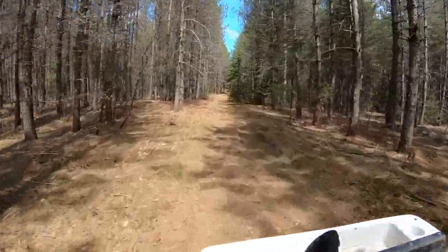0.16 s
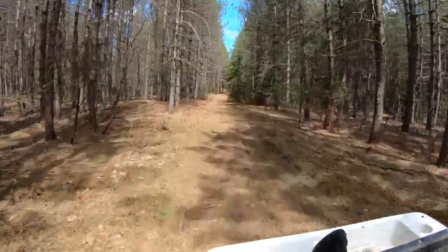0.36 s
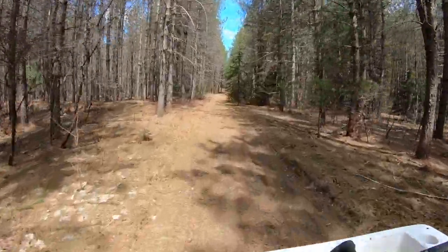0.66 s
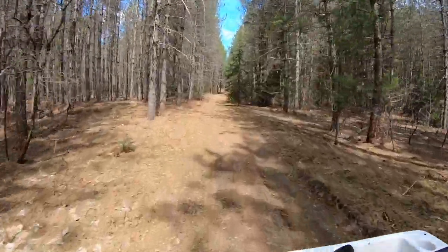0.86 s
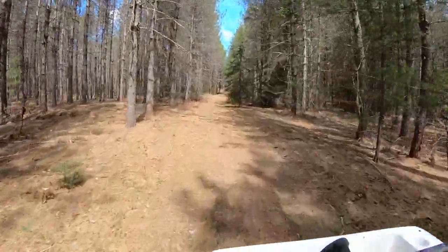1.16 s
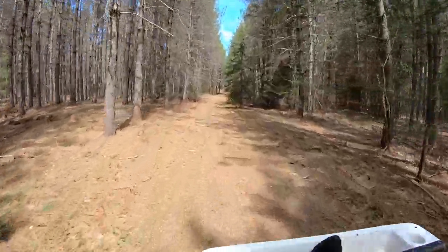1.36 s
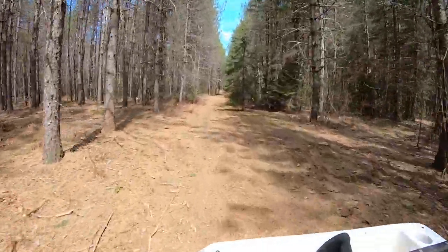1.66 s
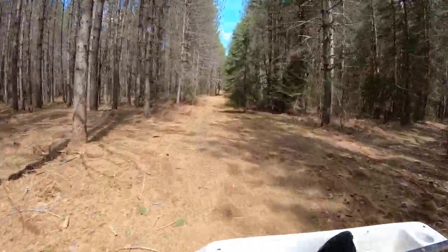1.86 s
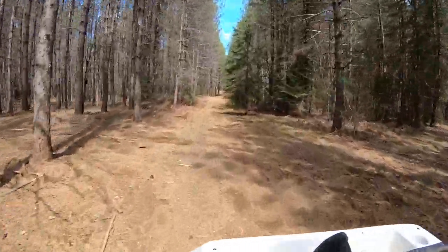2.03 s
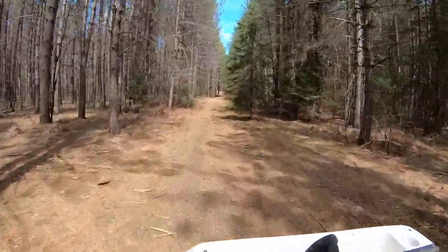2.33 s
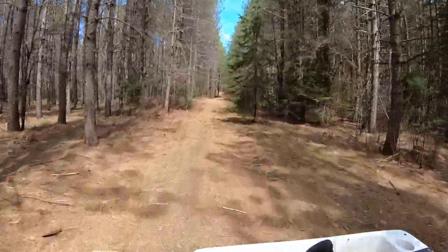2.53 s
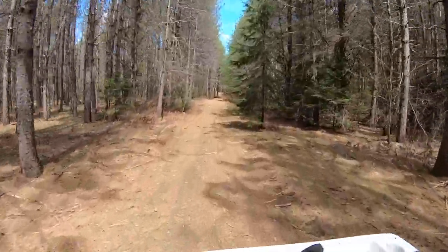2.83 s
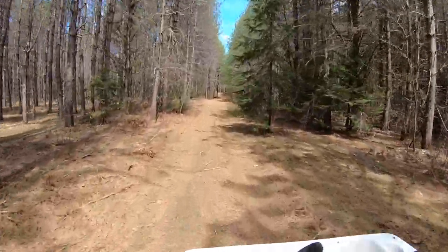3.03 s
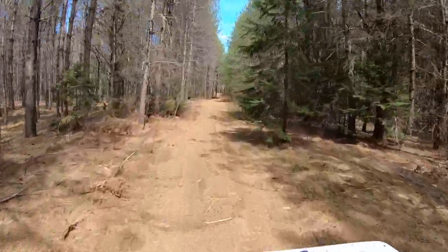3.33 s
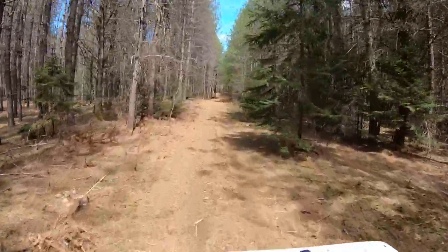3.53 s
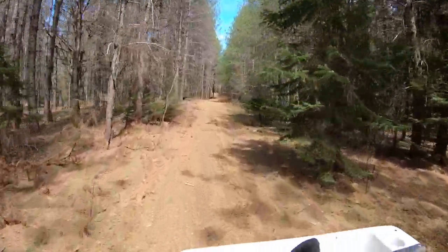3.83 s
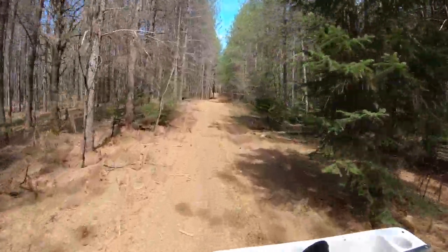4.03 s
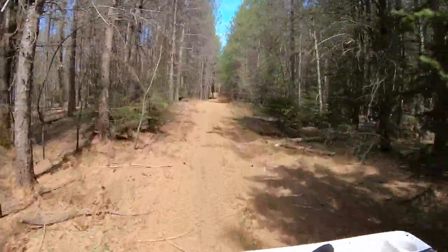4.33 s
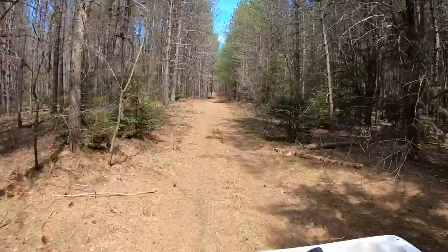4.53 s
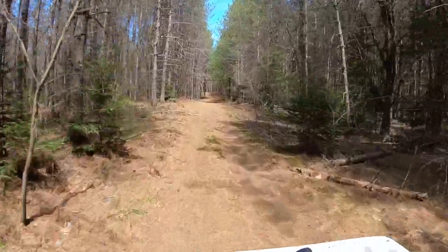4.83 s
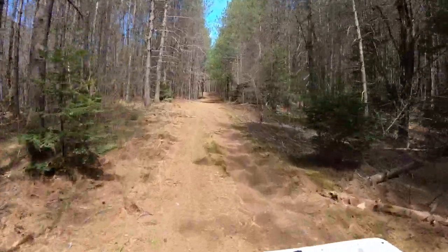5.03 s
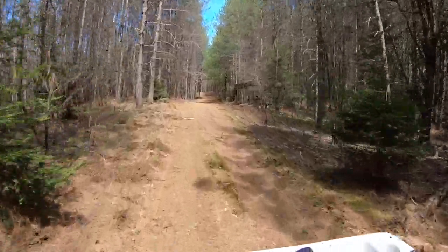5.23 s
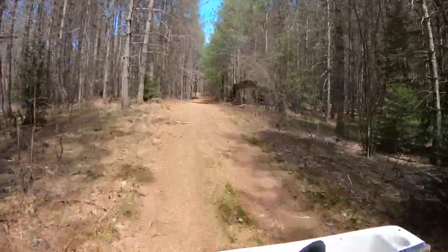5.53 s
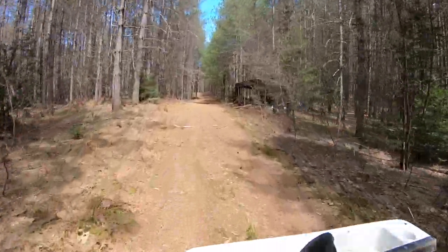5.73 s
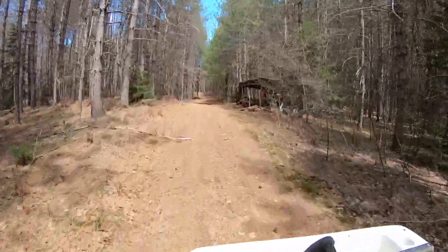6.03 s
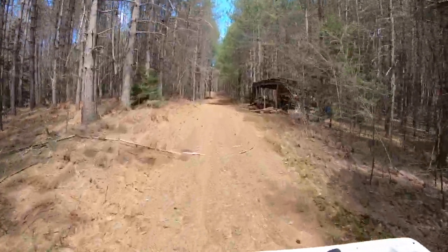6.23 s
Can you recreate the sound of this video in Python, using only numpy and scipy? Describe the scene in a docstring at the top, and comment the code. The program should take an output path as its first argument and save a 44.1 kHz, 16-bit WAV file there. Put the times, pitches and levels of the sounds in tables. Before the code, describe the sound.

A golf cart's small two-stroke engine runs steadily, heard from the seat while driving along a forest dirt trail. The exhaust makes a low, throbbing drone with body buzz and mechanical clatter, over tyres rumbling and faintly crunching grit. Loose parts rattle briefly on bumps. A gust brushes the left side early, a twig gives a tiny crack later, and near the end wind buffets harder while a thin belt rasp rises.

```python
"""A golf cart with a single-cylinder two-stroke engine drives along a dirt trail, heard from the seat.
From the start the exhaust drones and throbs, beating against the slightly slower belt drive; each
firing shakes the body and sets off a burst of clatter, while the tyres rumble and crunch over grit.
From half a second in, loose parts rattle on the bumps. A gust brushes the left side at 1.5 s, a twig
cracks under a tyre at 4.6 s, and near the end the wind buffets harder and the belt's rasp rises."""
import sys
import numpy as np
from scipy import signal
from scipy.io import wavfile

SR = 44100
rng = np.random.default_rng(int(sys.argv[2]) if len(sys.argv) > 2 else 0)


def generate_wav(sig):
    """Save sig (samples, or channels by samples) to the path in sys.argv[1] as 16-bit PCM at SR."""
    pcm = np.round(np.clip(np.atleast_2d(sig).T, -1, 1) * 32767).astype(np.int16)
    wavfile.write(sys.argv[1], SR, pcm)


N = 281347
LOW_SWELL_S = 4.263  # a moment when the low drone's surge peaks and the cover's boom dips slightly


def from_db(db):
    """Decibels to gain."""
    return 10 ** (np.asarray(db) / 20)


def rms_one(x):
    """Scale to unit rms."""
    return x / np.sqrt(np.mean(x ** 2) + 1e-20)


def in_time(rows):
    """Each column of an automation curve at every sample."""
    times_s, *columns = np.transpose(rows)
    return [np.interp(np.arange(N) / SR, times_s, column) for column in columns]


def at_hz(points, hz):
    """Read a spectrum on a log-frequency axis."""
    points_hz, values = np.transpose(points)
    return np.interp(np.log(hz), np.log(points_hz), values)


def pan(left_db):
    """Left and right gains, left_db apart, whose mean is 1."""
    left = from_db(np.atleast_1d(left_db))
    return np.array([2 * left, np.full_like(left, 2)]) / (1 + left)


def drift(rate_hz):
    """Slow random modulation at unit rms."""
    hop, settle = 40, 2000
    pole = np.exp(-2 * np.pi * rate_hz * hop / SR)
    noise = rng.standard_normal(N // hop + settle + 2)
    slow = signal.lfilter([1], [1, -2 * pole, pole * pole], noise)[settle:]
    return np.interp(np.arange(N) / hop, np.arange(len(slow)), rms_one(slow))


def low_pass(x, hz, order=2):
    """Butterworth low-pass."""
    return signal.sosfilt(signal.butter(order, hz, fs=SR, output="sos"), x)


def resonate(x, modes):
    """Parallel resonances with alternating signs."""
    out = 0
    for k, (hz, width_hz, db) in enumerate(modes):
        r = np.exp(-np.pi * width_hz / SR)
        poles = [1, -2 * r * np.cos(2 * np.pi * hz / SR), r * r]
        zeros = [(1 - r * r) / 2, 0, (r * r - 1) / 2]
        out = out + (-1) ** k * from_db(db) * signal.lfilter(zeros, poles, x)
    return out


def with_ringing(x, modes):
    """Add each resonance to the sound that excites it."""
    return x + sum(resonate(x, [mode]) for mode in modes)


def firing_pulse(turns, decay_turns):
    """An envelope that jumps at each firing, once a turn, and dies away."""
    return np.exp(-(turns % 1) / decay_turns)


def hit_envelope(start_s, t60_s):
    """Instant attack, then an exponential decay to -120 dB."""
    age_s = np.arange(N) / SR - start_s
    return (age_s >= 0) * from_db(-60 * np.clip(age_s / t60_s, 0, 2))


def banded_noise(spectrum, flicker_db, left_db=0):
    """Third-octave noise bands, each with its own flicker, width and pan; the mono mix has rms 1."""
    # how alike left and right are: band_hz, correlation
    likeness = [(25, .05), (60, 0.35), (110, 0.59), (340, 0.77), (610, 0.27), (900, 0.34), (1500, 0.39),
                (2500, 0.45), (4500, 0.064), (6000, -0.73), (9000, 0.083), (14000, 0)]
    # how far each band follows the pan: band_hz, pan_factor
    shadow = [(400, -0.5), (610, 2), (820, 0.94), (1100, 1), (1600, 1.72), (2600, 1.4), (4200, 0.3)]
    edges_hz = np.geomspace(16, 16384, 31)
    white, out = rng.standard_normal((2, 2, N)), np.zeros((2, N))
    for k, (low, high) in enumerate(zip(edges_hz, edges_hz[1:])):
        hz, flicker = np.sqrt(low * high), drift(18)
        if high < spectrum[0][0] or low > spectrum[-1][0]:
            continue
        band = signal.butter(3, [low, high], "band", fs=SR, output="sos")
        mid, side = signal.sosfilt(band, white[k % 2])
        alike = at_hz(likeness, hz)
        side = side * np.sqrt((1 - alike) / (1 + alike))
        gain = from_db(at_hz(spectrum, hz) + flicker_db * flicker)
        out += gain * np.array([mid + side, mid - side]) * pan(left_db * at_hz(shadow, hz))
    return out / np.sqrt(np.mean(out.mean(axis=0) ** 2))


def lag_since(start_s):
    """Turns that the belt drive has lost against the engine since start_s."""
    # belt slip, which paces the throb: time_s, lost_turns_per_s
    slip = [(0.0, 2.26), (0.5, 0.89), (1.0, 1.633), (1.9, 1.308), (2.5, 2.104), (3.3, 2.238), (3.9, 2.059),
            (4.7, 2.162), (5.3, 1.577), (6.38, 1.978)]
    lag = np.cumsum(in_time(slip)[0]) / SR
    return lag - np.interp(start_s, np.arange(N) / SR, lag)


def beating_drone(turns, levels, swell_s, order, drive_db, surge_db, waver_db, wander_rad):
    """One order of the engine beats with that of the slower drive; the level surges once a lost turn."""
    lag = lag_since(swell_s)
    phase = 2 * np.pi * (order * turns + rng.random()) + wander_rad * drift(5.2)
    drive_gain = from_db(drive_db)
    pair = np.sin(phase) + drive_gain * np.sin(phase - 2 * np.pi * order * lag)
    level_db = in_time(levels)[0] + surge_db * np.cos(2 * np.pi * lag) + waver_db * drift(14)
    return from_db(level_db) * pair * np.sqrt(2 / (1 + drive_gain ** 2))


def order_tone(turns, order, wander_rad):
    """A tone at a multiple of the firing rate; uneven combustion makes its phase wander."""
    return np.sqrt(2) * np.sin(2 * np.pi * (order * turns + rng.random()) + wander_rad * drift(6.2))


def exhaust(turns, firing_hz, shake_db):
    """Two strong orders throb; the weaker ones slide through the muffler's resonances."""
    # fader of the low drone: time_s, level_db
    low_levels = [(0.0, -20), (0.36, -23), (0.6, -17.5), (1.04, -22.5), (1.32, -18.5), (1.56, -35.5),
                  (1.68, -28.5), (2.0, -17), (2.28, -19.5), (2.64, -18), (3.24, -20.5), (5.04, -20.3),
                  (5.24, -23.5), (5.52, -20.5), (5.96, -21.5), (6.36, -25)]
    # fader of the upper drone: time_s, level_db
    upper_levels = [(0.0, -20.5), (0.36, -28), (0.679, -21), (1.12, -26), (1.36, -19), (1.88, -27.5),
                    (2.16, -18.5), (2.44, -30), (2.682, -20.5), (3.0, -28), (3.64, -21), (3.88, -29),
                    (5.08, -21.5), (5.36, -28.5), (5.6, -23), (6.36, -26)]
    # what the muffler passes of the weaker orders: pitch_hz, gain_db
    muffler = [(56, -1), (120, -13), (215, -4), (238, 0.5), (262, -6.5), (288, -3.5), (340, -5), (385, -16),
               (445, -19), (474, -5), (510, -19.5), (570, -13), (620, -12), (700, -24), (900, -24.5)]
    faster_hz = firing_hz - firing_hz.mean()  # speed tips each drone from drive towards engine
    low = beating_drone(turns, low_levels, swell_s=LOW_SWELL_S, order=2, drive_db=2.5 - 3 * faster_hz,
                        surge_db=1.2, waver_db=0.27, wander_rad=0.17)
    upper = beating_drone(turns, upper_levels, swell_s=4.232, order=3, drive_db=5 - 0.1 * faster_hz,
                          surge_db=1.57, waver_db=1.2, wander_rad=0.42)
    weak = 0
    for order in (1, *range(4, 16)):
        level_db = at_hz(muffler, order * firing_hz) + 2.87 * drift(7)
        weak = weak + from_db(level_db) * order_tone(turns, order, wander_rad=0.055 * order)
    return from_db(1) * (low + upper) + from_db(shake_db - 6) * weak


def body_buzz(turns, uneven_db):
    """Every firing kicks the panels, never twice with the same strength."""
    # body panels and muffler shell: pitch_hz, width_hz, gain_db
    panels = [(184, 55, -4.5), (237.2, 37, -3), (314.3, 35, 0), (537, 59, -21)]
    fired = np.diff(np.floor(turns), prepend=0)
    kicks = fired * from_db(uneven_db * rng.standard_normal(N))
    blast_mid, blast_side = rms_one(firing_pulse(turns, 0.35) * rng.standard_normal((2, N)))
    shake = 0.42 * rms_one(kicks) + blast_mid + 0.27 * blast_side * [[1], [-1]]
    return rms_one(low_pass(resonate(shake, panels), 850, order=4))


def sixth_order_hum(turns):
    """A soft, wavering engine hum near its sixth order, about 340 Hz."""
    return from_db(-39 + 0.92 * drift(2.8)) * order_tone(turns, order=6.1, wander_rad=0.62)


def trail_rumble():
    """The tyres roll over rough ground and the chassis rumbles."""
    # roughness of the trail, heard as rumble: time_s, level_db
    trail = [(0, -25), (.8, -23), (1.2, -24), (1.6, -21.5), (2.2, -26.5), (3.0, -26.5), (3.9, -24),
             (4.8, -26), (5.4, -24.5), (6.1, -22.5), (6.38, -26.5)]
    # tone of the rumble: band_hz, density_db
    spectrum = [(15, -10.5), (28, -5), (40, -2), (60, -7), (88, 5), (130, -1.5), (200, -3.5), (300, -14.5),
                (450, -21), (700, -29.5), (1200, -45)]
    return from_db(in_time(trail)[0] + 0.45 * drift(2.9)) * banded_noise(spectrum, flicker_db=0.3)


def clatter(turns, left_db):
    """Piston, intake and belt noise under the engine cover, stronger just after each firing."""
    # tone of the machinery: band_hz, density_db
    spectrum = [(350, -14.5), (480, -1.5), (620, -7), (740, -7), (900, -9.5), (1200, -11), (1600, -10),
                (2100, -21.5), (2700, -19), (3200, -34), (3800, -35.5), (4800, -54)]
    # ring of the engine cover: pitch_hz, width_hz, gain_db
    cover_modes = [(796, 90, -11), (1069, 120, -7), (1724, 120, -8), (1960, 26, -28.5)]
    bursts = rms_one(1 + 0.33 * firing_pulse(turns, 0.21))
    return with_ringing(bursts * banded_noise(spectrum, flicker_db=1.13, left_db=left_db), cover_modes)


def crunch(turns, grains_per_s, size_db):
    """Grit snaps under the tyres, over a fine metallic hiss that flutters with the engine."""
    # tone of grit and hiss: band_hz, density_db
    spectrum = [(2800, -11), (4200, -1.5), (5000, -2.5), (5900, -3), (7300, -5), (8200, -5), (10200, -8.5),
                (11200, -12.5), (12500, -18.5), (14500, -31)]
    # ring of the clutch and brake metal: pitch_hz, width_hz, gain_db
    metal_modes = [(5850, 110, -3.5), (6230, 250, -7.5), (6820, 200, 0.5), (7230, 300, -3.5)]
    struck = rng.random(N) < grains_per_s * from_db(4 * drift(5)) / SR
    sizes = from_db(size_db * np.minimum(rng.exponential(1, N), 5))
    decay = np.exp(-1 / (0.0018 * SR))  # 1.8 ms grains
    grains = rms_one(signal.lfilter([1], [1, -decay], struck * sizes + 1e-18))
    envelope = rms_one(1 + 0.16 * grains + 0.12 * firing_pulse(turns, 0.3))
    return with_ringing(envelope * banded_noise(spectrum, flicker_db=0.5), metal_modes) * pan(-4)


def belt_rub():
    """A thin rasp comes and goes as the belt rides in the clutch."""
    # fader of the rasp: time_s, level_db
    levels = [(0, -53), (.4, -63.5), (2.3, -62.5), (2.7, -60.5), (5.2, -59.5), (6.1, -60.5), (6.3, -49),
              (6.38, -51)]
    # resonances of the rubbing belt: pitch_hz, width_hz, gain_db
    belt_modes = [(1710, 90, 7), (2230, 170, -1.5), (2690, 180, 2), (2764, 170, 2), (3350, 190, -0.5)]
    friction = resonate(rng.standard_normal((2, N)), [(2650, 430, 0)])
    rasp = resonate(low_pass(friction, 2600, order=4), belt_modes)
    return from_db(in_time(levels)[0] + 5.2 * drift(4.7)) * rms_one(rasp)


def cover_boom(turns, pitch_hz, width_hz):
    """Each firing shakes the broad plastic cover, which booms on one resonance."""
    # fader of the boom: time_s, level_db
    levels = [(0, -38.5), (1.0, -42.5), (1.8, -44.5), (2.4, -37.5), (3.3, -36), (3.95, -42.5), (4.25, -34),
              (4.8, -41.5), (6.38, -42)]
    shaking = (1 + 0.66 * firing_pulse(turns, 0.41)) * rng.standard_normal(N)
    mode = [(pitch_hz, width_hz, 0)]
    boom = rms_one(resonate(resonate(shaking, mode), mode))
    throb = np.cos(2 * np.pi * lag_since(LOW_SWELL_S))
    return from_db(in_time(levels)[0] - 0.4 * throb - 0.2 * drift(3.9)) * boom * pan(-2.2)


def rattles():
    """A bump makes loose parts chatter briefly: a bright click and a duller knock of the plastic body."""
    # bumps: start_s, click_db, knock_db, t60_s
    bumps = [(0.548, -46, -31, 0.092), (.621, -68, -36, 0.017), (.710, -44.5, -37.5, 0.052),
             (2.098, -39.5, -25.5, 0.088), (2.114, -42, -34.5, 0.05), (2.4, -65, -31, 0.034),
             (3.632, -58, -42.5, 0.053), (3.927, -70, -31, 0.06), (4.134, -61, -29, 0.063),
             (4.386, -61, -26.5, 0.095), (4.593, -55, -31.5, 0.028), (4.759, -46, -45, 0.044),
             (4.958, -62, -36, 0.045), (6.095, -63, -50, 0.14)]
    # ring of the click: pitch_hz, width_hz, gain_db
    click_modes = [(2430, 89, 11.5), (4660, 2300, -5.5), (6160, 1200, -4.5), (7540, 430, -0.5),
                   (10000, 2500, -18)]
    # ring of the knock: pitch_hz, width_hz, gain_db
    knock_modes = [(674, 57, 8), (1000, 690, 1), (1590, 240, -4.5), (2440, 1400, -7.5)]
    click, knock, rings = 0, 0, 0
    for start_s, click_db, knock_db, t60_s in bumps:
        dying = hit_envelope(start_s, t60_s)
        click += from_db(click_db) * dying
        knock += from_db(knock_db) * dying
    for envelope, modes, top_hz in ((click, click_modes, 9500), (knock, knock_modes, 2300)):
        chatter = low_pass(rng.standard_normal((2, N)), top_hz, order=4)
        rings += resonate(envelope * chatter, modes) / np.std(resonate(chatter[0], modes))
    return rings * pan(-6)


def wind(corner_hz):
    """Gusts buffet the listener with lumpy low turbulence, nearly all on the left."""
    # gusts: time_s, level_db
    gusts = [(0, -55), (1.55, -29.5), (1.9, -48.5), (5.0, -43.5), (5.4, -29.5), (6.04, -27), (6.09, -17),
             (6.25, -28), (6.38, -40)]
    eddies = low_pass(low_pass(rng.standard_normal((2, N)), corner_hz), 2200)
    return from_db(in_time(gusts)[0] + 0.98 * drift(21)) * rms_one(eddies) * from_db([[0], [-14]])


def twig(t60_s):
    """Dry wood gives way under a tyre in two thin, very short cracks."""
    # cracks: start_s, level_db
    snaps = [(4.623, -38), (4.6280, -45.5)]
    # ring of the wood: pitch_hz, width_hz, gain_db
    wood_modes = [(4300, 720, -2), (7500, 1200, 4), (10000, 2000, -13), (12900, 2700, -20)]
    envelope = sum(from_db(level_db) * hit_envelope(start_s, t60_s) for start_s, level_db in snaps)
    return envelope * rms_one(resonate(rng.standard_normal((2, N)), wood_modes)) * pan(-8)


def under_canopy(x, echo_db):
    """Roof, seat and dash return a few close reflections, different on each side."""
    out = x.copy()
    delays_s = rng.uniform(0.002, 0.022, size=12)
    for k, lag in enumerate((delays_s * SR).astype(int)):
        out[k % 2, lag:] += from_db(echo_db) * rng.choice([-1, 1]) * x[k % 2, :-lag]
    return out


def scene():
    """Engine, chassis and tyres, all riding along with the listener."""
    # engine speed: time_s, firing_hz
    speed = [(0, 60), (.4, 59), (.55, 54), (.74, 55.6), (.86, 60), (1.4, 59), (1.62, 58.7), (1.95, 55.6),
             (2.3, 56.1), (2.55, 56.4), (3.0, 56.2), (3.3, 55.7), (3.65, 57.2), (4.17, 56.7), (4.55, 56.2),
             (4.95, 57.3), (5.6, 55.6), (6.38, 56.2)]
    # load on the running gear, riding clatter and crunch: time_s, level_db
    load = [(0, -40), (.3, -39.5), (.68, -41.5), (.77, -39), (1.35, -37.5), (1.8, -39.2), (2.4, -39.5),
            (3.1, -40.5), (3.44, -38.5), (3.68, -41), (4.09, -43.5), (4.3, -39), (4.7, -40), (5.0, -41.5),
            (5.65, -41), (6.15, -40.5), (6.25, -44), (6.38, -41)]
    # engine shake, riding the body's buzz and the weaker exhaust orders: time_s, level_db
    shake = [(0, -29.5), (.2, -25.5), (.5, -28.5), (.8, -27), (1.35, -25.5), (1.7, -26.5), (2.1, -24.5),
             (2.45, -29), (3.65, -27), (4.3, -29.5), (4.8, -28), (5.8, -28.5), (6.38, -31)]
    # pan, as left over right: time_s, drone_left_db, clatter_left_db
    sides = [(0, 0.5, -7.5), (.9, 0, -9.5), (4.4, -0.1, -9.5), (5.8, 1.5, -9.5), (6.15, 5.5, -16),
             (6.38, 1, -3)]
    firing_hz, load_db = in_time(speed)[0], in_time(load)[0]
    turns = np.cumsum(firing_hz) / SR
    shake_db = in_time(shake)[0] + 0.76 * drift(4.5)
    crunch_db = -64.5 + 0.98 * (load_db - load_db.mean())
    drone_left_db, clatter_left_db = in_time(sides)
    drone = exhaust(turns, firing_hz, shake_db)
    buzz = from_db(shake_db - 4) * body_buzz(turns, uneven_db=5)
    low_end = (drone + buzz + sixth_order_hum(turns) + trail_rumble()) * pan(drone_left_db)
    machinery = from_db(load_db + 1.92) * clatter(turns, clatter_left_db)
    tyres = from_db(crunch_db) * crunch(turns, grains_per_s=130, size_db=-2.5) + twig(t60_s=0.0096)
    bright = under_canopy(machinery + tyres + belt_rub() + rattles(), echo_db=-19)
    boom = cover_boom(turns, pitch_hz=612.7, width_hz=107)
    return low_end + boom + bright + wind(corner_hz=250)


def record(dry):
    """The sound fades in over 5 ms and the top is cut steeply above 14.4 kHz."""
    fade = np.minimum(np.arange(N) / SR / 0.005, 1)
    return signal.sosfilt(signal.ellip(10, 0.1, 80, 14400, fs=SR, output="sos"), dry * fade)


dry = scene()
out = record(dry)
generate_wav(out)
```